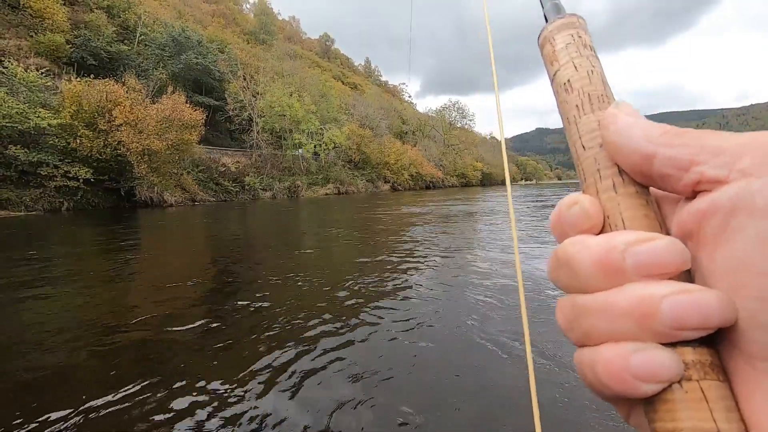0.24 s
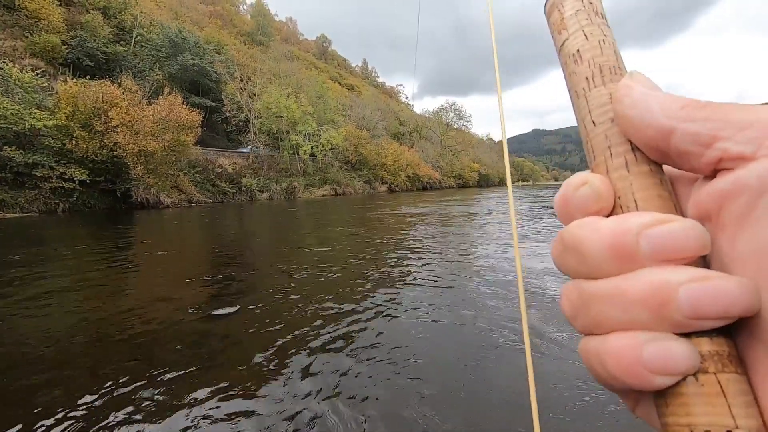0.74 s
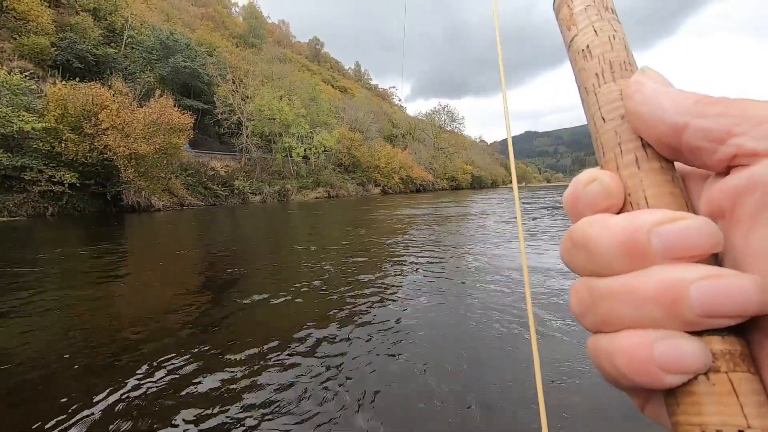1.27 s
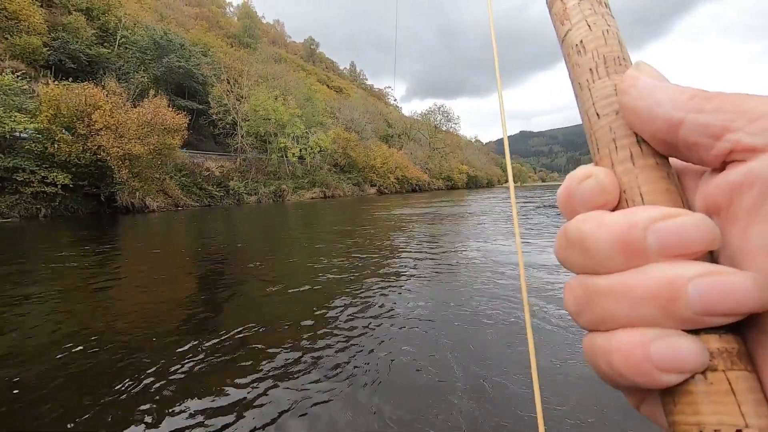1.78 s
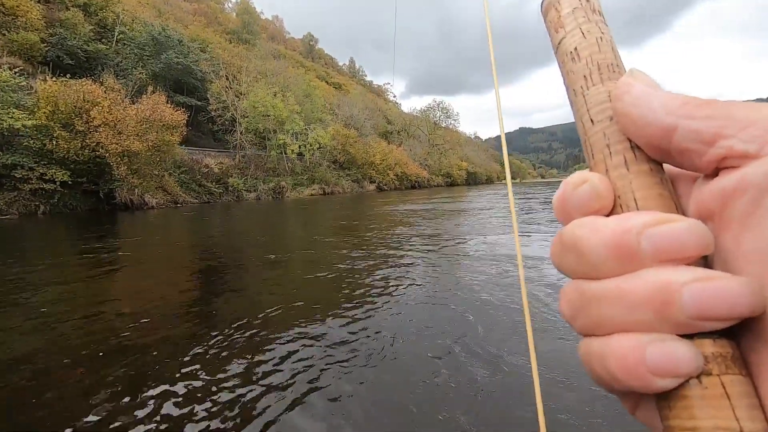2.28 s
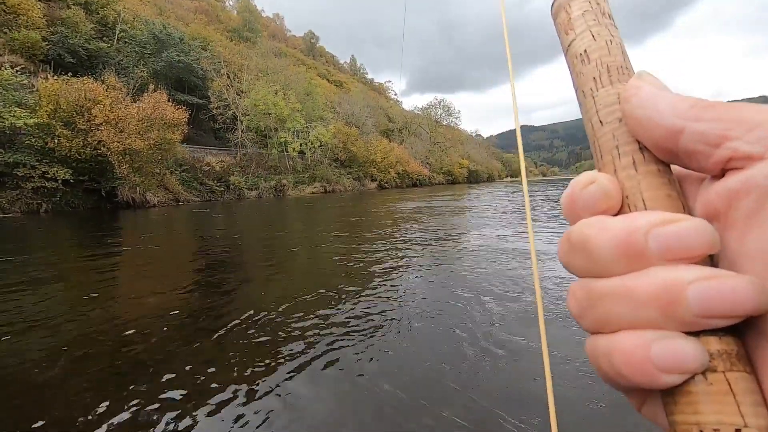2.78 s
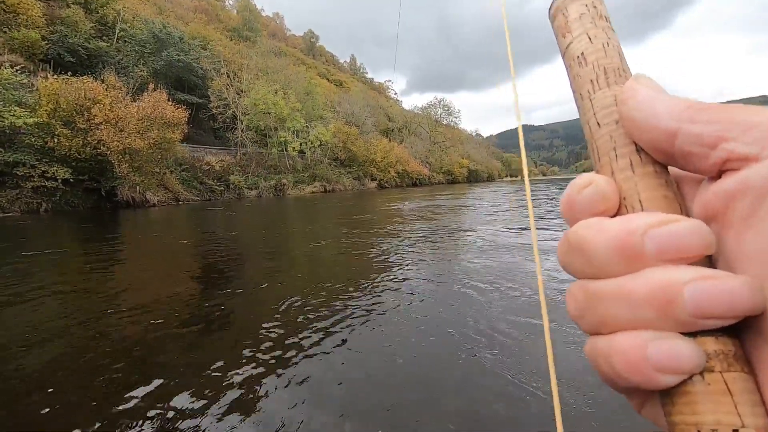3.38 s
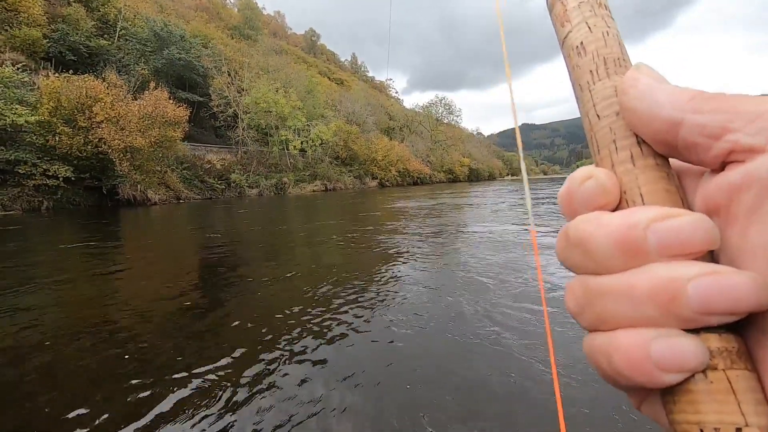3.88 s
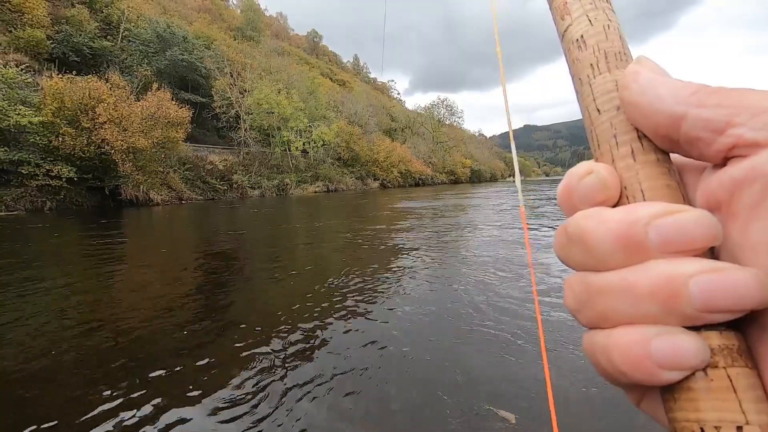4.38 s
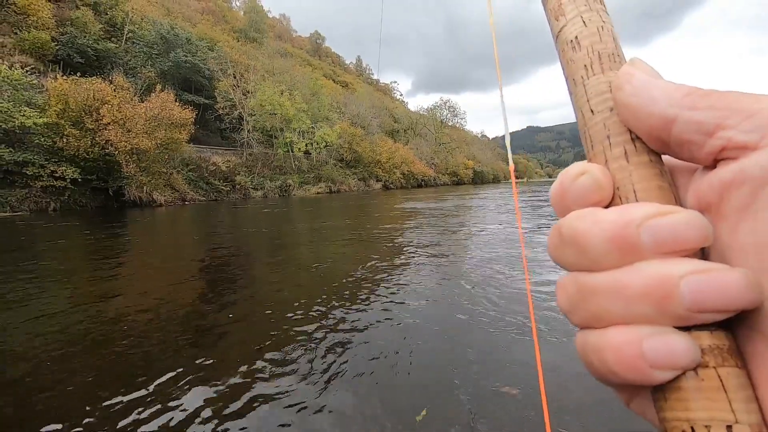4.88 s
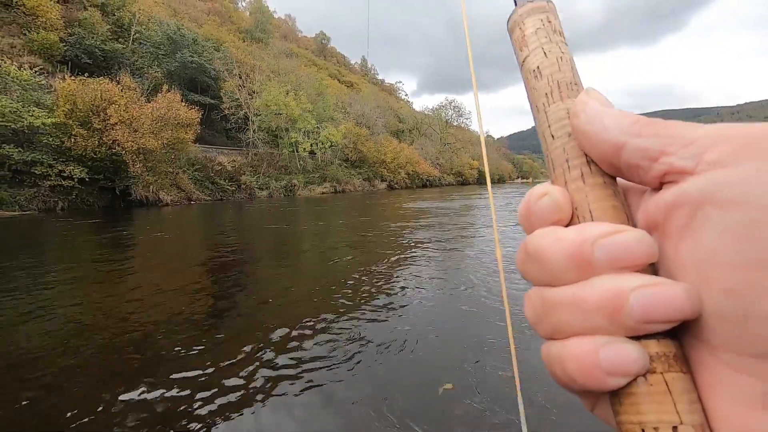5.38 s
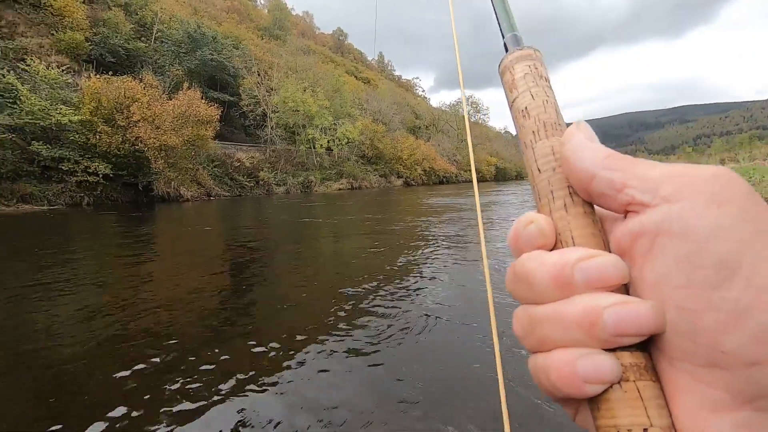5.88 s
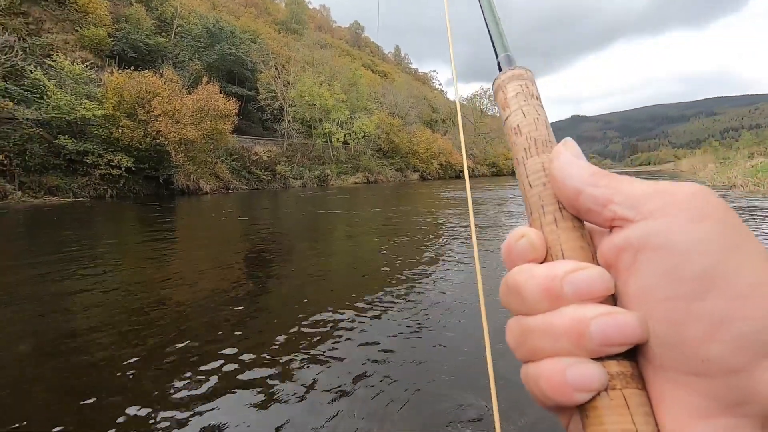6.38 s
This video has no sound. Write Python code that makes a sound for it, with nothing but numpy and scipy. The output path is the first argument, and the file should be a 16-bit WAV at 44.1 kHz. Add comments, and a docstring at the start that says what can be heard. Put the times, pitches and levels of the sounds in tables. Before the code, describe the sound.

A soft, wide wash of river water and the low drone of a distant car open the scene; the car fades over the first three seconds to a faint rumble. Almost at once a fly reel starts clicking close on the right, sharp, metallic and much louder than the background. For the first two seconds it gives single ticks and brief stuttering tugs as a fish pulls line. From about 2.2 seconds four quicker bursts follow one another, leading into a very fast, buzzing run from 3.3 to 3.9 seconds that falters once midway. After half a second of just the background, a short tug comes at 4.5 seconds, then a few single clicks. From about 5.1 seconds the reel runs again, slower than before and with a slightly changed ring, speeding up and slowing unevenly until the end at about 6.6 seconds.

```python
"""A low drone and a wash of water open the scene: a car draws away along the far bank of a river.
Almost at once a fly reel clicks close by on the right as a fish pulls line. Its sprung pawl snaps
over the ratchet teeth singly, in short tugs and in two fast runs. Each snap is an impulse that sets
the reel's metal chattering; the colour recurs with each turn of the spool and shifts when the rod
is lifted."""
import sys
import numpy as np
from scipy import signal
from scipy.fft import rfft, irfft, next_fast_len
from scipy.io import wavfile
from scipy.ndimage import uniform_filter1d, minimum_filter1d, map_coordinates

SR = 44100
rng = np.random.default_rng(int(sys.argv[2]) if len(sys.argv) > 2 else 0)


def pcm_store(signal):
    """Save signal as 16-bit PCM."""
    levels = np.round(np.clip(np.atleast_2d(signal), -1, 1) * 32767)
    wavfile.write(sys.argv[1], SR, levels.astype(np.int16).T)


N = 293044

# Envelopes of the car's engine, low rumble and road roar: time_s, relative_level_db
DRONE_LEVEL = [(0.2, -35.5), (0.9, -38.5), (1.45, -45), (1.75, -37.5), (2.6, -48), (3.4, -47), (4.8, -44.5),
               (5.4, -54), (6.2, -48.5), (6.64, -54)]
RUMBLE_LEVEL = [(0, -43), (0.55, -41.5), (0.75, -42), (1.1, -45), (1.3, -35.5), (1.5, -43.5), (1.85, -39.5),
                (2.3, -43), (3.4, -46), (6.64, -48)]
ROAR_LEVEL = [(0, -38.5), (1.2, -35), (1.7, -36), (2.2, -36), (2.65, -40), (3.5, -45.5), (4, -42.5),
              (5.1, -43.5), (6.64, -47.5)]
# Spectra of the rumble and the roar: frequency_hz, relative_density_db
RUMBLE_SPECTRUM = [(10, -49), (22, -20), (35, -9.5), (70, 0), (105, 0.5), (150, -3.5), (220, -6),
                   (500, -25.5), (2000, -84), (4000, -120)]
ROAR_SPECTRUM = [(40, -57.5), (120, -12), (190, -1), (260, 0), (340, -6.5), (500, -8.5), (700, -16.5),
                 (1200, -24), (4000, -120)]
# Envelopes of the wash (water and distant tyres) and the ripple hiss: time_s, relative_level_db
WASH_LEVEL = [(0, -40), (1.9, -40.5), (3, -42), (3.9, -44.5), (5, -45), (6.64, -44)]
RIPPLE_LEVEL = [(0, -57), (1.8, -59), (2.6, -59.5), (3.9, -56), (4.3, -68.5), (5, -61.5), (6.6, -52.5)]
# Spectra of the wash and the ripple hiss: frequency_hz, relative_density_db
WASH_SPECTRUM = [(20, -43.5), (100, -8.5), (450, -13.5), (700, -3.5), (1000, 0), (1350, -2), (2000, -10.5),
                 (2500, -23), (4000, -33), (9000, -95), (12000, -120)]
RIPPLE_SPECTRUM = [(200, -58), (1200, -15), (2000, 3), (2900, 6), (4000, -6.5), (6000, -13), (10000, -24),
                   (11300, -41), (13000, -52), (17000, -83)]
# Single teeth slipping past the pawl: time_s
SLIPS = [0.0811, 0.6545, 0.9135, 0.9542, 1.4959, 2.018, 4.7381, 4.7965, 5.0801, 5.1176]
# Short tugs on the line: start_s, tooth_count, first_rate_hz, middle_rate_hz, last_rate_hz
TUGS = [(0.219, 6, 28.3, 37.8, 25.1), (0.4133, 3, 30.3, 29, 28.2), (1.0385, 5, 15.4, 17.5, 17.8),
        (2.2311, 9, 27.1, 47.6, 47.4), (2.4671, 6, 36.2, 64.1, 46.1), (2.707, 13, 36.2, 64.3, 24.4),
        (2.9996, 10, 38.1, 56.6, 52), (4.4606, 5, 18.9, 33.9, 18)]
# Spool speed in the two runs: time_s, tooth_rate_hz
FIRST_RUN = [(3.2743, 24.51), (3.3397, 132.97), (3.3919, 156.21), (3.4108, 109.4), (3.463, 37.87),
             (3.5501, 142.62), (3.639, 126.98), (3.7364, 157.12), (3.8126, 96.87), (3.9338, 48.97)]
SECOND_RUN = [(5.1479, 48.93), (5.1778, 64.45), (5.2963, 65.44), (5.3679, 40.01), (5.4459, 58.92),
              (5.5602, 45.46), (5.6424, 61.83), (5.6964, 58.55), (5.9156, 85.93), (5.9963, 51.26),
              (6.0765, 100.03), (6.1314, 66.07), (6.2036, 51.25), (6.345, 87.29), (6.4332, 55.7),
              (6.4875, 77.59), (6.6457, 42.87)]
# The pawl touching a tooth without slipping: time_s, relative_level_db
TOUCHES = [(4.6494, -24), (4.8808, -30), (5.021, -30), (5.0964, -31)]
# The pawl's own resonances: centre_hz, width_hz, gain_db
PAWL_MODES = [(3500, 450, 6), (5600, 500, 7), (7400, 600, 7)]
# Broad spectral envelope of a snap: frequency_hz, gain_db
SNAP_SPECTRUM = [(150, -27), (600, -10), (1100, -2.5), (2000, -2.5), (3000, 1), (4500, 2), (5400, 6.5),
                 (8000, 4), (8700, 2), (10200, 5), (11000, -9), (14200, -13), (15600, -26), (16600, -29)]
# Reel resonances, rod steady and rod lifted: centre_hz, nominal_width_hz, gain_db
STEADY_MODES = [(1010, 100, 3), (1341, 323, 19.5), (2080, 50, 7), (2530, 91, 6), (3934, 1010, 8.5),
                (4330, 240, -6.5), (5990, 610, 5), (7550, 770, 7)]
LIFTED_MODES = [(930, 130, 14.5), (1413, 280, 16.7), (2032, 117, 10.4), (3620, 2370, 5.16),
                (6000, 380, 5.1), (7400, 400, 8.6), (9350, 310, 5.2), (12000, 380, 5.8)]
# Bands that swell as the spool turns: centre_hz, width_hz, swing_db, swells_per_turn, peak_tooth
STEADY_SWELLS = [(3000, 1200, 2, 1, 16.5), (4970, 760, 0, 1, 11.7), (6320, 400, 3.2, 1, 5),
                 (5600, 820, 1, 2, 1.5)]
LIFTED_SWELLS = [(3380, 2500, 2.2, 1, 16.7), (3740, 520, 3.4, 2, 2.4), (4900, 650, 3.6, 1, 3.6),
                 (5800, 660, 2.6, 3, 3), (7500, 1500, 1.7, 1, 3.2)]
# Slow rise and fall of the ring near 7.5 kHz: time_s, relative_level_db
HIGH_RING_LEVEL = [(0.35, -3), (0.9, 3.5), (1.2, 4), (2.3, 3), (2.55, 1), (3.9, -4.3), (4.5, 2.5), (5.1, 4)]
# Bands that move with or against that ring: centre_hz, width_hz, share_db_per_db
RING_BANDS = [(3230, 480, 0.8), (3870, 320, -0.4), (5260, 330, -0.3), (5900, 590, -0.3), (7300, 1600, 0.75)]
# Acoustic shadow on the side away from the reel: frequency_hz, left_gain_db
LEFT_SHADOW = [(300, 4), (1000, -17), (1400, -14), (2200, -12.5), (3000, -14), (4000, -6), (4600, -10.5),
               (5500, -6.5), (6100, -6), (7600, -12), (9000, -2.5), (10200, 0), (12000, -3.5), (15500, 1.5)]
# Phase shift on that side: frequency_hz, left_lead_rad
LEFT_PHASE = [(0, 0), (1380, 2.1), (2580, -0.0), (3270, 0.7), (4310, -0.5), (5000, -2.2), (5770, -1.9),
              (7240, -2.0), (8100, -7.1), (9220, -3.4), (10200, -3.3), (13800, -8.7), (15500, -18.9),
              (16400, -19.1)]


def amp(db):
    """Amplitude ratio of a level in decibels."""
    return 10 ** (np.asarray(db) / 20)


def unit(x):
    """Normalisation to an rms of 1."""
    return x / np.sqrt(np.mean(x ** 2) + 1e-20)


def along(points, hz):
    """Interpolation on a logarithmic frequency axis."""
    knot_hz, values = np.transpose(points)
    return np.interp(np.log(hz + 1), np.log(knot_hz + 1), values)


def envelope(points):
    """Linear interpolation in time, one value a sample."""
    return np.interp(np.arange(N) / SR, *np.transpose(points))


def wobble(rate_hz):
    """Slow random modulation: a spline through rate_hz knots a second."""
    knots = rng.standard_normal(int(N * rate_hz / SR) + 4)
    return map_coordinates(knots, [np.arange(N) * rate_hz / SR])


def bell(hz, centre, width, power=2):
    """Resonance curve, halved at centre +/- width / 2; a higher power steepens its sides."""
    return 1 / (1 + (2 * (hz - centre) / width) ** power)


def filtered(x, response):
    """Linear filtering: the spectrum is multiplied by a frequency response."""
    size = next_fast_len(N + SR // 2)
    return irfft(rfft(x, size) * response(np.fft.rfftfreq(size, 1 / SR)), size)[..., :N]


def noise(spectrum, channels=1):
    """Spectrally shaped noise of rms 1, uncorrelated between channels."""
    white = rng.standard_normal((channels, N))
    return unit(filtered(white, lambda hz: amp(along(spectrum, hz))))


def car(drone_hz=53, width_hz=11):
    """Narrowband noise gives the engine a pitch; road noise is broadband. Both ears hear them alike."""
    drone = unit(filtered(rng.standard_normal(N), lambda hz: bell(hz, drone_hz, width_hz)))
    drone = drone / np.abs(signal.hilbert(drone)) ** .5  # the engine note wavers only gently
    drone = amp(envelope(DRONE_LEVEL) - 1 + wobble(7)) * unit(drone)
    rumble = amp(envelope(RUMBLE_LEVEL) + 1 + 0.8 * wobble(12)) * noise(RUMBLE_SPECTRUM)
    roar = amp(envelope(ROAR_LEVEL) + wobble(6.1)) * noise(ROAR_SPECTRUM)
    return (drone + rumble + roar) * amp([[-.5], [.5]])


def river():
    """Water, distant tyres and ripple hiss sound wide because the two ears get uncorrelated noise."""
    wash = amp(envelope(WASH_LEVEL) + 2 + 0.26 * wobble(3.1)) * noise(WASH_SPECTRUM, channels=2)
    hiss = amp(envelope(RIPPLE_LEVEL) + 6 + 0.5 * wobble(6.3)) * noise(RIPPLE_SPECTRUM, channels=2)
    return wash * amp([[1.5], [-1.5]]) + hiss * amp([[.7], [-.7]])


def tug_times(start_s, teeth, *rates_hz):
    """Period is the reciprocal of rate, which follows one parabolic arc through a tug."""
    arc = np.polyfit([0, .5, 1], rates_hz, 2)
    rate_hz = np.polyval(arc, np.linspace(0, 1, int(teeth) - 1))
    return start_s + np.append(0, np.cumsum(1 / rate_hz))


def run_times(speed):
    """Rotation is the integral of speed: a snap falls at each whole tooth turned."""
    knot_s, rate_hz = np.transpose(speed)
    t = np.arange(knot_s[0], knot_s[-1], 1 / SR)
    turned = np.cumsum(np.interp(t, knot_s, rate_hz)) / SR
    return np.interp(np.arange(int(turned[-1]) + 1), turned, t)


def chatter(count, drift_teeth=2.58, rise_s=0.00076, tail_db=6, tail_t60_s=0.014, size=700):
    """Each impact is a noise burst with exponential decay, correlated between neighbouring teeth."""
    t = np.arange(size) / SR
    tooth = np.arange(count)
    nearness = np.exp(-((tooth[:, None] - tooth) / drift_teeth) ** 2)
    shared = unit(nearness @ rng.standard_normal((count, size)))
    fresh = 0.54 * rng.standard_normal((count, size))
    blow = (t / rise_s) ** 2 * np.exp(2 - 2 * t / rise_s)
    tail = amp(tail_db - 60 * t / tail_t60_s) * np.minimum(t / rise_s, 1)
    return (shared + fresh) * np.hypot(blow, tail)


def pawl_resonance(bursts, spread=0.061, drift_teeth=2.5):
    """The pawl's modes wander in pitch as its tip meets each tooth at a slightly different place."""
    count, size = bursts.shape
    hz = np.fft.rfftfreq(size, 1 / SR)
    spectra = rfft(bursts)
    for centre, width, db in PAWL_MODES:
        drift = map_coordinates(rng.standard_normal(count), [np.arange(count) / drift_teeth])
        mode_hz = centre * np.exp(spread * drift[:, None])
        resonance = 1j * hz * width / (mode_hz ** 2 - hz ** 2 + 1j * hz * width)
        spectra = spectra * (1 + (amp(db) - 1) * resonance)
    return irfft(spectra, size)


def place(times, shapes):
    """Superposition of one short waveform per event."""
    index = np.round(times * SR).astype(int)[:, None] + np.arange(shapes.shape[1])
    return np.bincount(index.ravel(), shapes.ravel(), N)[:N]


def ringing(x, gain_db, size=4096):
    """Causality: a minimum-phase filter with this gain curve rings only after it is struck."""
    cepstrum = irfft(np.log(amp(gain_db(np.fft.rfftfreq(size, 1 / SR)))))
    cepstrum[1:size // 2] *= 2
    cepstrum[size // 2 + 1:] = 0
    impulse_response = irfft(np.exp(rfft(cepstrum)))
    return signal.fftconvolve(x, impulse_response[None], axes=1)[:, :N]


def snaps(times, gains, modes, knock_db, knock_delay_s=.0004, split_hz=2300, min_width_hz=150):
    """Source and filter: a clean knock below split_hz and chatter above excite the reel's modes."""
    def colour_db(hz):
        peaks = sum(db * bell(hz, centre, max(width, min_width_hz)) for centre, width, db in modes)
        return along(SNAP_SPECTRUM, hz) + peaks

    def low_share(hz):
        return 1 / (1 + (hz / split_hz) ** 4)

    def chatter_train():
        bursts = pawl_resonance(chatter(len(times)))
        hz = np.fft.rfftfreq(bursts.shape[1], 1 / SR)
        # before its gain, each snap is scaled to the same energy, whatever its colour
        weights = amp(colour_db(hz)) ** 2 * (1 - low_share(hz))
        energy = np.average(np.abs(rfft(bursts)) ** 2, axis=1, weights=weights)
        return place(times, (gains / np.sqrt(energy))[:, None] * bursts)

    right = chatter_train()
    left = (right + 1.25 * chatter_train()) / np.hypot(1, 1.25)  # partly coherent with the right
    knocks = place(times + knock_delay_s, gains[:, None] * amp(knock_db))
    highs = filtered(np.array([left, right]), lambda hz: np.sqrt(1 - low_share(hz)))
    lows = filtered(knocks, lambda hz: np.sqrt(low_share(hz)))
    return ringing(highs + lows, colour_db)


def spool_colour(x, tooth_times, swells, teeth_per_turn=29.5):
    """Periodic modulation: the pawl's seat shifts through each turn. Other bands drift slowly."""
    tooth = np.interp(np.arange(N) / SR, tooth_times, np.arange(len(tooth_times)))
    ring_db = envelope(HIGH_RING_LEVEL)
    bands = [(centre, width, swing * np.cos(2 * np.pi * per_turn * (tooth - peak) / teeth_per_turn))
             for centre, width, swing, per_turn, peak in swells]
    bands += [(centre, width, share * ring_db) for centre, width, share in RING_BANDS]
    for centre, width, gain_db in bands:
        x = x + (amp(gain_db) - 1) * filtered(x, lambda hz: bell(hz, centre, width, power=4))
    return x


def afterring(x, spool_hz=5937, spool_db=-21, spool_t60_s=.3, scatter_db=-25, scatter_t60_s=0.11):
    """Free decay and scattering: the spool sings on faintly; angler and water reflect a short tail."""
    t = np.arange(SR // 3) / SR
    fade = amp(-60 * t / spool_t60_s)
    sing = 2 * np.sin(2 * np.pi * spool_hz * t) * fade / fade.sum()
    scatter = rng.standard_normal((2, len(t))) * amp(-60 * t / scatter_t60_s)
    tail = amp(spool_db) * sing + amp(scatter_db) * scatter / np.linalg.norm(scatter[0])
    return x + signal.fftconvolve(x, tail, axes=1)[:, :N]


def reel(rod_lift_s=4.95, spread_db=1.18):
    """An impulse train: clicks, single, in tugs and in runs, all about equally loud at any speed."""
    tugs = [tug_times(*tug) for tug in TUGS]
    tooth_times = np.sort(np.concatenate([SLIPS, *tugs, run_times(FIRST_RUN), run_times(SECOND_RUN)]))
    touch_times, touch_db = np.transpose(TOUCHES)
    times = np.concatenate([tooth_times, touch_times])
    level_db = np.concatenate([np.zeros(len(tooth_times)), touch_db])
    gains = amp(level_db + spread_db * rng.standard_normal(len(times)))
    early = times < rod_lift_s
    steady = amp(-0.08) * snaps(times[early], gains[early], STEADY_MODES, knock_db=-1.0)
    lifted = amp(-1.04) * snaps(times[~early], gains[~early], LIFTED_MODES, knock_db=-1.2)
    steady = spool_colour(steady, tooth_times, STEADY_SWELLS)
    lifted = spool_colour(lifted, tooth_times, LIFTED_SWELLS)
    left, right = afterring(steady + lifted)
    left = filtered(left, lambda hz: amp(along(LEFT_SHADOW, hz)) * np.exp(1j * along(LEFT_PHASE, hz)))
    return np.array([left, right])


def scene():
    """Sound pressures add: the distant car, the river and the reel close by."""
    return car() + river() + reel()


def record(dry, ceiling=.48, hold_s=.004, top_hz=16600):
    """Fast peak limiting evens out the snaps; a low-pass removes everything above top_hz."""
    hold = round(hold_s * SR)
    needed_gain = np.minimum(1, ceiling / (np.abs(dry).max(axis=0) + 1e-9))
    gain = uniform_filter1d(minimum_filter1d(needed_gain, hold), hold)
    return filtered(dry * gain, lambda hz: hz < top_hz)


dry = scene()
out = record(dry)
pcm_store(out)
```